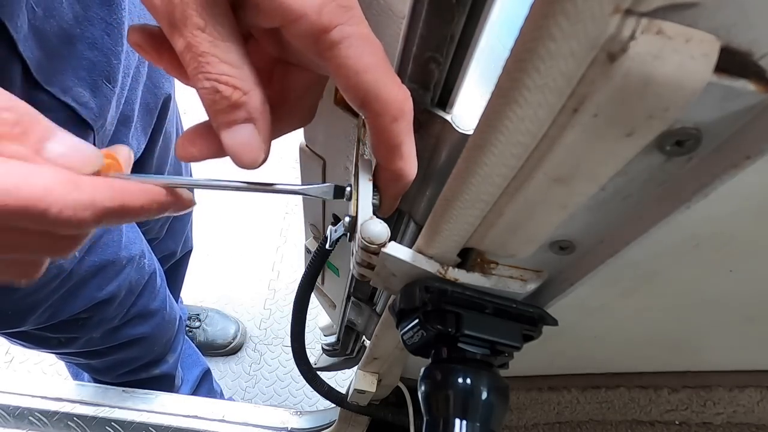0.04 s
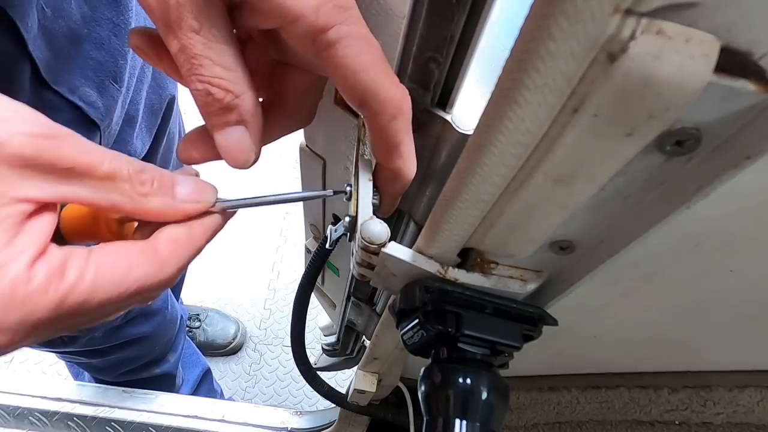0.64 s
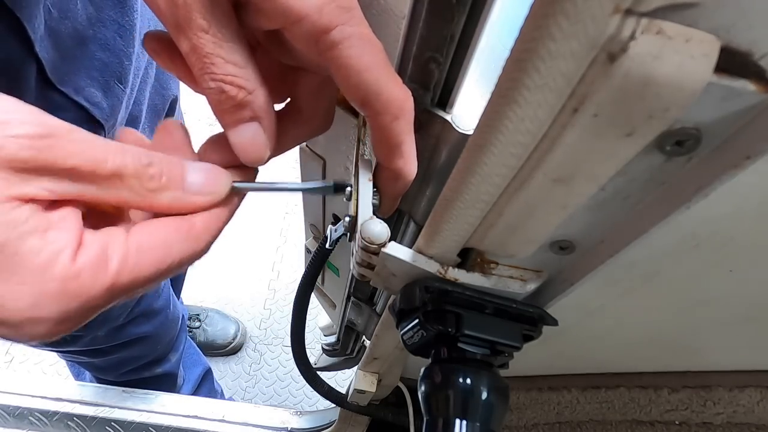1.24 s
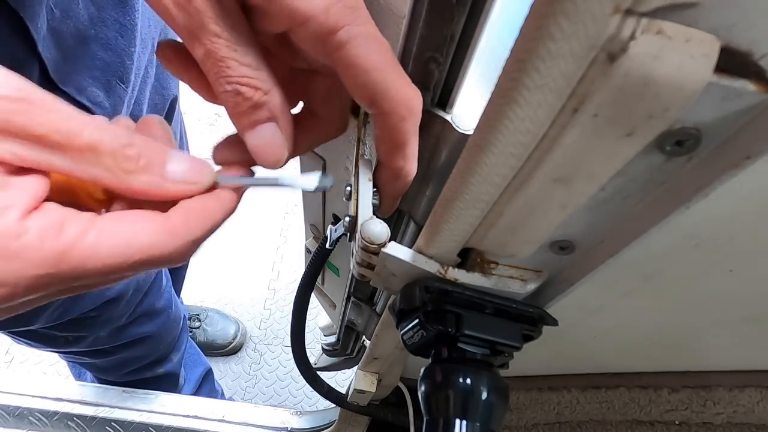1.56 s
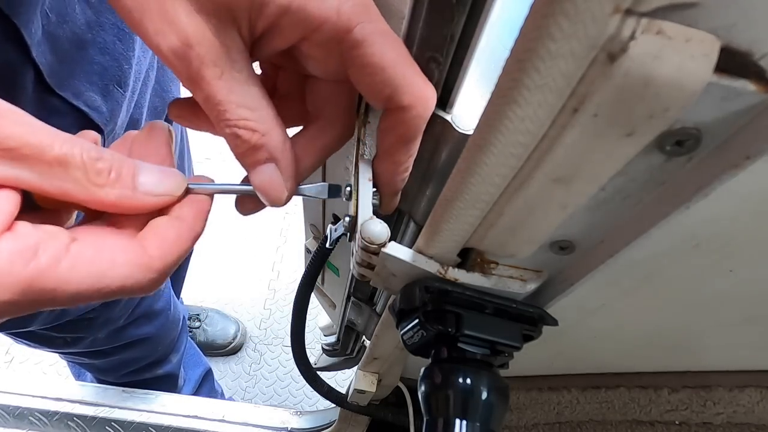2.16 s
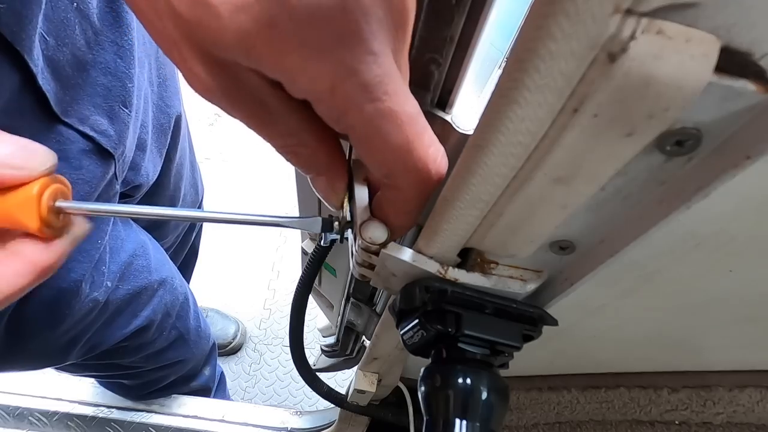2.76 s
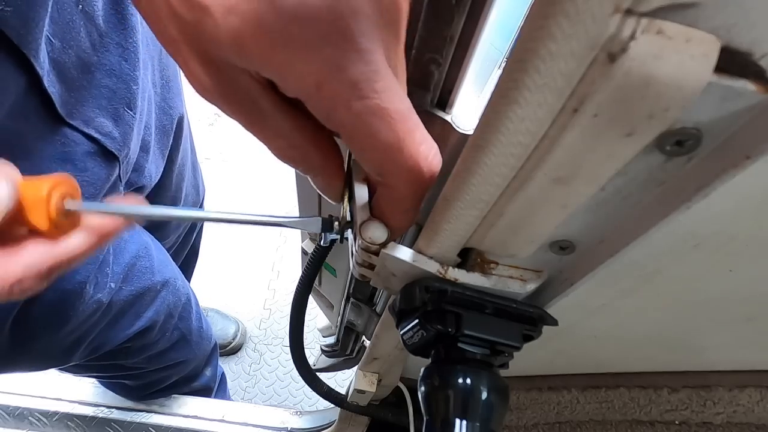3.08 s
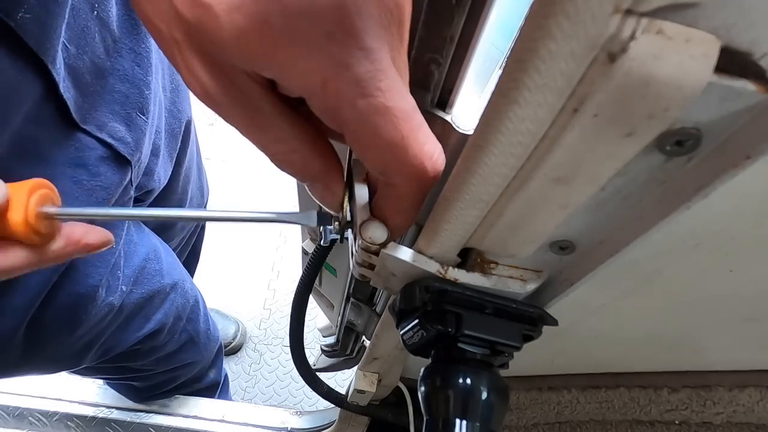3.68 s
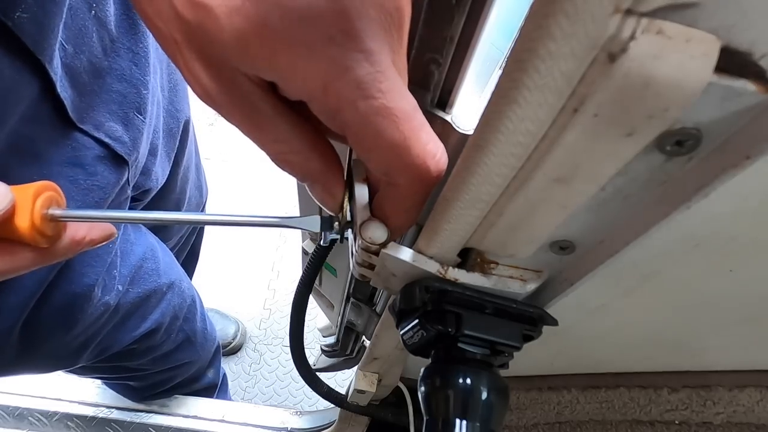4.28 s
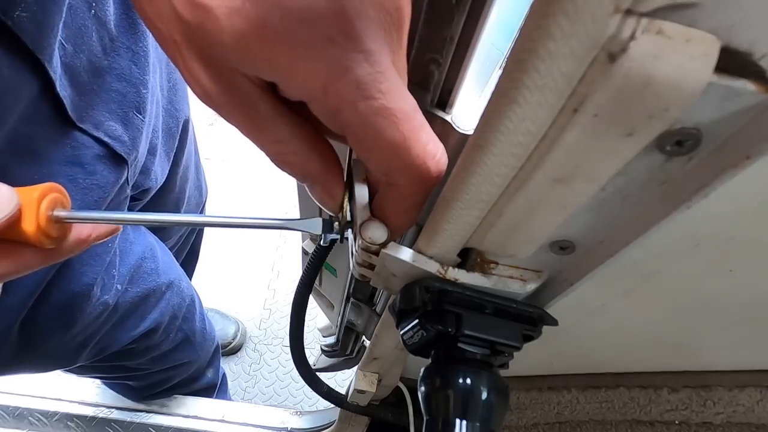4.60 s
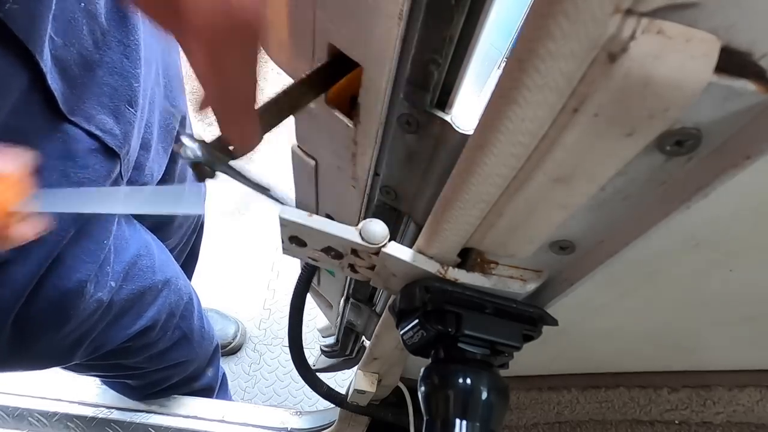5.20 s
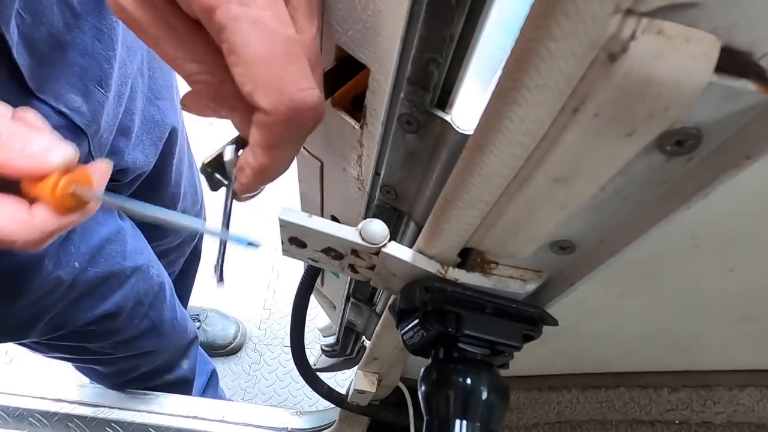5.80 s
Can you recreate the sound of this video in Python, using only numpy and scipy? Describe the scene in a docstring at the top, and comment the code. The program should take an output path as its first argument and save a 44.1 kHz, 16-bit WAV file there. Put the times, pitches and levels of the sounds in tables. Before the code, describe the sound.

A screwdriver works on a screw close to the microphone, outdoors, over a soft rumble and hiss. For the first five seconds it makes quiet, irregular ticks and soft scrapes, with a small slip at 0.5 seconds, a sharper skid at 1.3 and a firmer click at 3.2. A few thin, very faint bird calls come from far away between about 1.6 and 4.3 seconds. At 5.1 seconds a springy steel bar suddenly comes free and bangs against its frame in a loud, rapid clatter, sending a low shudder through the microphone. From about 5.3 seconds small steel parts ring with high, bright tones, strongest around 5.4. Loose tools then clink and drag along the bar in short scrapes, more quietly, until about 5.8 seconds. The knocks carry a slight, short echo.

```python
"""A springy steel bar comes free and bangs about in its frame, outdoors and close to a camera.
Before that, for five seconds, a screwdriver ticks and slips on the screw while a spanner holds the nut.
When the screw lets go, the bar's blows shake the camera mount and send small steel parts off ringing,
and the loose tools clink and drag along the bar. Birds call far away over a soft rumble and hiss,
and nearby panels add a short echo."""
import sys
import numpy as np
from scipy import signal
from scipy.fft import rfft, irfft, next_fast_len
from scipy.io import wavfile
from scipy.ndimage import map_coordinates

SR = 44100
rng = np.random.default_rng(int(sys.argv[2]) if len(sys.argv) > 2 else 0)


def digitize_waveform(pressure):
    """Quantize a signal to 16-bit integers and store it at the path in sys.argv[1].

    Rows of a 2-D input are taken as channels; values are limited to [-1, 1].
    """
    field = np.atleast_2d(pressure).T
    bounded = np.clip(field, -1, 1)
    quanta = np.round(bounded * 32767).astype(np.int16)
    wavfile.write(sys.argv[1], SR, quanta)


N = 257984
TIME = np.arange(N) / SR

# A "colour" says how strong each frequency is; "t60" is the time a sound takes to fade by 60 dB.
# how the three layers of the background rise and fall: t/s, rumble/dB, air/dB, hiss/dB
AIR_LEVELS = [(0.0, -55.5, -57.5, -64.5), (0.9, -62, -63, -67), (1.22, -57.5, -61, -67),
              (1.71, -58.5, -62.5, -65.5), (2.3, -59.5, -63, -69), (2.6, -51.5, -59.5, -65.5),
              (3.79, -57, -61, -65), (4.21, -58.5, -57, -63), (4.8, -57.5, -58.5, -63.5),
              (5.0, -55, -54.5, -62)]
# colour of the background: f/Hz, level/dB
OUTDOOR_COLOUR = [(12, 6), (20, 4), (81, 0), (107, -3.5), (146, -14), (301, -16.5), (388, -16),
                  (849, -16.5), (1760, -27.5), (8650, -30), (14700, -38.5), (16000, -27)]
# calls of distant birds: t/s, length/s, middle f/Hz, level/dB
BIRD_CALLS = [(1.598, 0.096, 3480, -69), (2.06, 0.088, 3950, -69), (2.486, .03, 3850, -62),
              (2.54, 0.073, 3280, -65), (2.917, 0.03, 4000, -58.5), (3.022, .05, 3430, -62),
              (3.125, .038, 4150, -60.5), (3.33, 0.03, 3600, -62), (4.285, .066, 3210, -58.5)]
# how long the echo from nearby panels lasts: f/Hz, t60/s
ECHO_DECAY = [(100, 0.27), (500, 0.21), (2000, 0.14), (6000, 0.14), (15000, 0.077)]

# colour of the shaking camera mount: f/Hz, level/dB
SHUDDER_COLOUR = [(12, -33), (20, 6), (92, -6.5), (118, -10), (232, -9), (334, -14.5), (431, -11),
                  (474, -3), (500, -23), (650, -49), (1100, -120)]
# slow, soft pushes on the camera: t/s, level/dB
CAMERA_BUFFETS = [(2.78, -45), (3.39, -44)]

# the tools slide along the bar: t/s, length/s, level/dB
TOOL_DRAGS = [(5.449, 0.078, -35.5), (5.543, 0.065, -37), (5.631, 0.062, -37.5), (5.724, 0.12, -30.5)]
# colour of steel rubbing on steel: f/Hz, level/dB
RUB_COLOUR = [(88, -36), (150, -3.5), (589, -13), (790, 4), (941, -9.5), (1630, -12.5), (2060, -7.5),
              (3770, -12.5), (6910, -19), (7920, -22), (9080, -23), (9820, -32), (16000, -29)]
# frequencies that the tools boost: f/Hz, width/Hz, level/dB
TOOL_RESONANCES = [(883, 25, -7), (1124, 27, 9), (1310, 110, -2.5), (2030, 450, -2), (2700, 120, -15),
                   (4550, 230, 2.5), (5070, 130, 4), (6200, 49, -5), (7060, 100, -3), (8750, 180, 7.5),
                   (10800, 250, -15), (11040, 240, 8), (14700, 640, -11)]

# the blade touches screw and nut; grip and pressure set the pitch: t/s, f/Hz, ring/dB, clack/dB, click/dB
BLADE_TICKS = [(.038, 830, -49, -51, -47), (.609, 1120, -37.5, -51, -48), (1.0625, 697, -47, -45.5, -80),
               (1.329, 623, -28, -31, -56), (1.8628, 735, -37.5, -56, -41.5), (1.928, 830, -41, -55, -55),
               (2.008, 980, -44, -55, -50), (2.547, 328, -47.5, -45, -83), (3.183, 414, -31.5, -25, -35.5),
               (3.187, 1090, -29, -26, -37.5), (3.26, 685, -46.5, -48, -59), (3.904, 765, -32.5, -60, -68),
               (3.912, 512, -40.5, -69, -68), (3.953, 795, -46.5, -62, -54), (4.148, 633, -38, -54, -70),
               (4.205, 1050, -38, -41, -69), (4.302, 915, -35.5, -47, -60), (4.409, 994, -38, -47, -61),
               (4.4637, 1060, -39.5, -34, -45.5), (4.798, 613, -41.5, -58, -53),
               (4.9945, 407, -42, -35.5, -74)]
# colour of a tick: f/Hz, level/dB
TICK_COLOUR = [(150, -43), (350, -15), (550, -5), (1000, -1.5), (1400, -6.5), (2200, -6.5), (3300, -19.5),
               (5000, -9.5), (8000, -17.5), (15000, -27.5)]
# tones of the held screwdriver: multiple of the tick's pitch, level/dB, share of the ring's t60
SHAFT_TONES = [(1.001, 1.5, 0.75), (2.1, -17, 0.7), (4.4, -24.5, 0.65)]
# soft scrapes, with a faint high sizzle swelling and fading: peak t/s, rasp/dB, sizzle/dB
SOFT_SCRAPES = [(.17, -50.5, -66), (.31, -57.5, -62.5), (0.531, -49, -68), (0.637, -44.5, -63),
                (.999, -52.5, -63), (1.16, -66, -65), (1.89, -50.5, -64), (2.015, -51.5, -59),
                (2.34, -57.5, -64), (2.565, -53.5, -71), (2.655, -55.5, -59.5), (2.96, -65, -62),
                (3.182, -45.5, -56), (4.164, -52, -70)]
# colour of that scraping: f/Hz, level/dB
SCRAPE_COLOUR = [(200, -13), (500, 4), (900, 5), (1800, -9.5), (2900, -9.5), (3600, -18), (5200, -7),
                 (9000, -7.5), (11500, -20), (15000, -13)]
# the blade jumps out of the slot: t/s, length of the scrape before it/s, level/dB
BLADE_SKIDS = [(.518, 0.0092, -31.5), (1.329, .04, -21.5)]
# tones of the bar humming after a skid: f/Hz, level/dB, t60/s
BAR_LOW_TONES = [(503.5, 0, 0.15), (618, 1.5, 0.073), (1022, -8, 0.059), (2560, -15, 0.061)]

# small steel parts are set ringing: t/s, level/dB, treble tilt/(dB per octave), t60/s
STEEL_RINGS = [(5.264, -29, 18, 0.21), (5.286, -26.5, -2.5, 0.38), (5.326, -25.5, 3, 0.19),
               (5.385, -7.5, 14, 0.13), (5.399, -26, 12, .12), (5.416, -22, -8, 0.061),
               (5.483, -28, 10, 0.18), (5.717, -40, 1, .18)]
# their tones, where close pairs throb against each other: f/Hz, level/dB, multiple of the ring's t60
STEEL_TONES = [(2896, -15, 1.3), (4581, -24, 1), (6019, -1, 1.2), (6066, -10, 1), (8190, -15, 1),
               (10163, -17, .9), (10245, -3.5, 1.1), (13198, -14, 1), (15332, -8, .9), (15420, -3, .9),
               (15490, -12, .8)]
# washer, spanner and blade knock together: t/s, clack/dB, click above the clack/dB, t60/s
TOOL_CLINKS = [(5.379, -37, 12, 0.05), (5.3855, -27, 6.5, 0.055), (5.3984, -22.5, 5.5, 0.063),
               (5.4177, -5, -18, 0.0081), (5.429, -34, 14, 0.062), (5.434, -16, 2, 0.019),
               (5.458, -27.5, -3, 0.043), (5.4844, -24, 7, 0.034), (5.54, -28.5, 6.5, 0.056),
               (5.543, -21.5, -3, 0.063), (5.630, -32.5, 1, 0.069), (5.6656, -18.5, 4, 0.014),
               (5.719, -24, 1.5, 0.043)]
# colour of a clink: f/Hz, level/dB
COLLISION_COLOUR = [(88, -33), (150, 13), (216, -24), (386, -3), (477, -4.5), (833, -2.5), (1430, -6),
                    (2810, -2), (3820, -7), (5950, -0.5), (6550, -2.5), (9630, -5), (10400, -13),
                    (12600, -8.5), (15000, -10)]
# the bar rings briefly as the tools graze it: t/s, level/dB
BAR_PINGS = [(5.632, -51), (5.719, -35), (5.775, -44)]
# the high tones of those pings: f/Hz, level/dB, t60/s
BAR_HIGH_TONES = [(1870, -5, 0.25), (2630, -2, 0.28), (4700, 1, 0.09), (6840, 1.5, 0.12), (8800, -2, .25),
                  (11400, -22, 0.24)]

# the bar hits its frame: t/s, level/dB, step from each band to the next higher/dB, hardness from 0 to 1
BAR_BLOWS = [(5.0806, -8.5, 0, 0.99), (5.112, -10, 1.5, 1), (5.120, -6.5, 2.5, 0.73),
             (5.133, -18.5, 0, 0.47), (5.1543, -14.5, -4.5, 0.8), (5.176, -31, 0, 0),
             (5.219, -23.5, -2, 0.28), (5.237, -25.5, -3.5, 0.01), (5.2498, -15.5, 5, 0.69),
             (5.263, -22, 2, 1), (5.316, -34, -2, 0.45)]
# colour of a blow: f/Hz, level/dB
BLOW_COLOUR = [(71, -36), (120, 0.5), (217, -13), (289, 0), (569, -6), (617, -2.5), (805, -4), (1030, -5.5),
               (1290, -5), (2530, -12), (3520, -16), (7660, -15.5), (16000, -30.5)]
# frequencies that the frame boosts: f/Hz, width/Hz, level/dB
FRAME_RESONANCES = [(288, 130, -20), (864, 13, -1), (1072, 33, 2.5), (1562, 14, 2), (1983, 74, -1.5),
                    (2270, 33, 7.5), (2540, 82, -8), (3220, 200, -14)]
# low tones of the whole frame clunking: f/Hz, level/dB, t60/s
FRAME_TONES = [(264, -6, 0.2), (307, 6.5, 0.13), (381.3, 1.5, 0.24), (515, -8, 0.12), (623, 7.5, 0.1),
               (670, -14, 0.14)]


def amp(db):
    """Turn decibels into a number to multiply by."""
    return 10 ** (np.asarray(db) / 20)


def unit(x):
    """Scale a signal to an average strength (rms) of 1."""
    return x / np.sqrt(np.mean(x ** 2) + 1e-20)


def since(s):
    """Seconds since time s, zero before it."""
    return np.maximum(TIME - s, 0)


def along(points, hz):
    """Read between the rows of a (frequency, value) table, giving each octave equal room."""
    freqs, values = np.transpose(points)
    return np.interp(np.log(hz + 1), np.log(freqs + 1), values)


def wobble(rate):
    """A smooth random curve through `rate` new values a second."""
    return map_coordinates(rng.standard_normal(int(N * rate / SR) + 4), [TIME * rate])


def metal_gain(hz, colour, resonances, lift_db, ripple_hz, ripple_db):
    """The tone of a metal part: its colour, a few strong peaks and a ripple of many weak ones."""
    peaks = sum(amp(db + lift_db) / (1 + (2 * (hz - centre) / width) ** 2)
                for centre, width, db in resonances)
    ripple = np.interp(hz / ripple_hz, np.arange(2048), rng.standard_normal(2048))
    return amp(along(colour, hz)) * (1 + peaks) * amp(ripple_db * ripple)


def noise_bands(gain, edges_hz):
    """Noise shaped by gain(hz) and split softly at the edges into equally strong bands."""
    size = next_fast_len(N)
    hz = np.fft.rfftfreq(size, 1 / SR)
    spectrum = rfft(rng.standard_normal(size)) * gain(hz)
    bands = []
    for low, high in zip(edges_hz, edges_hz[1:]):
        band = 1 / np.sqrt((1 + (low / (hz + 1)) ** 8) * (1 + (hz / high) ** 8))
        bands.append(unit(irfft(spectrum * band)[:N]))
    return bands


def add_burst(out, noise, s, db, rise, t60):
    """Add a burst of noise that swells up to time s and then dies away."""
    span = slice(max(0, int((s - 6 * rise) * SR)), int((s + 1.5 * t60) * SR))
    t = TIME[span] - s
    shape = np.exp(np.minimum(t, 0) / rise) * amp(-60 * np.maximum(t, 0) / t60)
    burst = noise[span] * shape
    out[span] += amp(db) * burst * np.linalg.norm(shape) / (np.linalg.norm(burst) + 1e-12)


def ring(tones, s, rise, blur=0):
    """Fading tones from time s on; blur makes them waver, as in a part that tumbles and rattles."""
    out, first = np.zeros(N), int(s * SR)
    t = TIME[:min(N - first, SR // 3)]
    attack = 1 - np.exp(-t / rise)
    for hz, db, t60 in tones:
        cycles = hz * t + rng.random()
        cycles += blur * np.cumsum(rng.standard_normal(len(t))) / np.sqrt(SR)
        out[first:first + len(t)] += amp(db - 60 * t / t60) * np.sin(2 * np.pi * cycles) * attack
    return np.sqrt(2) * out


def outdoor_air():
    """Low rumble, soft air and hiss, each drifting a little in level."""
    rumble, air, hiss = noise_bands(lambda hz: amp(along(OUTDOOR_COLOUR, hz)), [15, 170, 2500, 16000])
    times, *columns = np.transpose(AIR_LEVELS)
    rumble_db, air_db, hiss_db = [np.interp(TIME, times, column) for column in columns]
    return (rumble * amp(rumble_db + 0.74 + 0.7 * wobble(8.8))
            + air * amp(air_db - 1.16 + 1.8 * wobble(48))
            + hiss * amp(hiss_db - 1.5 + 0.06 * wobble(10)))


def birds():
    """Thin, buzzy calls far away that glide up and level off."""
    out = np.zeros(N)
    buzz = 1 + 0.035 * wobble(900)
    for s, length, hz, db in BIRD_CALLS:
        span = slice(int(s * SR), int((s + length) * SR))
        progress = np.linspace(0, 1, span.stop - span.start)
        sweep_hz = 4000 * np.exp(-length / 0.0277)  # short calls climb steeply, long ones hardly at all
        pitch = (hz + sweep_hz * (0.25 - (1 - progress) ** 2)) * buzz[span]
        out[span] += amp(db) * np.sin(np.pi * progress) * np.sin(2 * np.pi * np.cumsum(pitch) / SR)
    return out


def panel_echo(x):
    """Nearby panels answer with a short, slightly stereo echo whose treble dies first."""
    hz, t, spectrum = signal.stft(rng.standard_normal((2, SR // 2)), SR, nperseg=256)
    fade = amp(-60 * t / along(ECHO_DECAY, hz)[:, None])
    tail = signal.istft(spectrum * fade, SR, nperseg=256)[1]
    mid, side = signal.fftconvolve(x[None], tail / np.linalg.norm(tail[0]), axes=1)[:, :N]
    return mid + amp(-40.5) * np.array([side, -side])


def camera_mount():
    """The bar's jolt travels up the mount as a low shudder; before it, slow buffets come and go."""
    jolt_s, attack_s, hold_s, fall_db_per_s = 5.08, 0.02, 0.22, 89
    shudder, = noise_bands(lambda hz: amp(along(SHUDDER_COLOUR, hz)), [18, 380])
    buffet, = noise_bands(lambda hz: 1 / (hz + 10), [6, 24])
    attack = 1 - np.exp(-since(jolt_s) / attack_s)
    shake = amp(-21 - fall_db_per_s * since(jolt_s + hold_s))
    handling = amp(-44.5)  # a little shudder stays while the tools are moved
    sway = sum(amp(db) * np.exp(-0.5 * ((TIME - s) / 0.14) ** 2) for s, db in CAMERA_BUFFETS)
    return shudder * attack * (shake + handling) + buffet * sway


def dragging_tools():
    """Steel slides on steel in small catches that make the tools ring; each slide fades as it slows."""
    attack_s, sag_db_per_s, release_s = 0.0047, 66, 0.018
    gain = lambda hz: metal_gain(hz, RUB_COLOUR, TOOL_RESONANCES,
                                 lift_db=2.5, ripple_hz=50.5, ripple_db=2)
    rub, = noise_bands(gain, [200, 16000])
    pressure = np.zeros(N)
    for s, length, db in TOOL_DRAGS:
        attack = 1 - np.exp(-since(s) / attack_s)
        release = np.exp(-since(s + length) / release_s)
        pressure += amp(db - sag_db_per_s * since(s)) * attack * release
    catches = amp(2.4 * wobble(160))
    return rub * pressure * catches


def blade_ticks():
    """Each touch of the blade gives a hollow ring, a thud, a clack and a click; low ones last longer."""
    out, rise_s = np.zeros(N), 0.00036
    thud, clack, click = noise_bands(lambda hz: amp(along(TICK_COLOUR, hz)), [240, 850, 3300, 15000])
    for s, hz, ring_db, clack_db, click_db in BLADE_TICKS:
        clack_t60 = 21.8 / hz  # 21.8 cycles of the pitch
        ring_t60 = 1.9 * clack_t60
        tones = [(hz * multiple, db, ring_t60 * share) for multiple, db, share in SHAFT_TONES]
        out += amp(ring_db) * ring(tones, s, rise_s)
        add_burst(out, thud, s, ring_db - 13, rise_s, ring_t60)
        add_burst(out, clack, s, clack_db, rise_s, clack_t60)
        add_burst(out, click, s, click_db, rise_s, 0.7 * clack_t60)
    return out


def blade_skids(rasp, sizzle):
    """The blade scrapes ever harder, judders and jumps out of the slot, leaving tool and bar humming."""
    swell_db_per_s, stop_s = 478, 0.0053
    judder_hz, judder_t60 = 531.5, 0.081
    out = np.zeros(N)
    scrape = (amp(-5) * rasp + amp(-18) * sizzle) * unit(amp(2.5 * wobble(600)))
    judder = np.sqrt(2) * amp(-0.5) * np.sin(2 * np.pi * (judder_hz * TIME + 0.09 * wobble(200)))
    for s, length, db in BLADE_SKIDS:
        swell = (TIME > s - length) * amp(db - swell_db_per_s * np.maximum(s - TIME, 0))
        fade_in = np.minimum(since(s - length) / length, 1)
        out += swell * scrape * np.exp(-since(s) / stop_s)
        out += swell * judder * fade_in * amp(-60 * since(s) / judder_t60)
        out += amp(db) * ring(BAR_LOW_TONES, s, rise=0.0013)
    return out


def screwdriver():
    """The blade ticks in the slot and skids; soft scrapes and a faint high sizzle swell and fade."""
    out = blade_ticks()
    rasp, sizzle = noise_bands(lambda hz: amp(along(SCRAPE_COLOUR, hz)), [340, 3400, 15800])
    grain = unit(amp(2.7 * wobble(500)))
    for s, rasp_db, sizzle_db in SOFT_SCRAPES:
        add_burst(out, rasp * grain, s, rasp_db, rise=0.022, t60=0.14)
        add_burst(out, sizzle * grain, s, sizzle_db, rise=0.022, t60=0.14)
    return out + blade_skids(rasp, sizzle)


def ringing_steel():
    """Washer and spanner ring as they fly and collide, each ring with its own level, brightness, length."""
    out = np.zeros(N)
    for s, db, tilt_db, t60 in STEEL_RINGS:
        tones = [(hz, level + tilt_db * np.log2(hz / 10000), t60 * multiple)
                 for hz, level, multiple in STEEL_TONES]
        out += amp(db) * ring(tones, s, rise=0.0024, blur=1.1)
    flicker = amp(wobble(110))
    return out * flicker


def clinking_tools():
    """The loosened tools collide in short, bright knocks and graze the bar, which pings."""
    out = np.zeros(N)
    gain = lambda hz: metal_gain(hz, COLLISION_COLOUR, TOOL_RESONANCES,
                                 lift_db=2, ripple_hz=70.84, ripple_db=3)
    knock, clack, click = noise_bands(gain, [200, 900, 3500, 15600])
    for s, db, bright_db, t60 in TOOL_CLINKS:
        rise = 0.013 * t60
        knock_db = db - 4 + 10.5 * np.log2(t60 / 0.055)  # a briefer contact carries less low knock
        add_burst(out, knock, s, knock_db, rise, 1.74 * t60)
        add_burst(out, clack, s, db, rise, t60)
        add_burst(out, click, s, db + bright_db, rise, 0.58 * t60)
    roughness = amp(2.1 * wobble(900))
    pings = sum(amp(db) * ring(BAR_HIGH_TONES, s, rise=0.0015, blur=1.5) for s, db in BAR_PINGS)
    return out * roughness + pings


def banging_bar():
    """The freed bar hammers and chatters on its frame, which clunks; hard blows are sharp and short."""
    soft_rise_s, hard_rise_s = 0.0026, 0.00017
    soft_t60, hard_t60 = 0.16, 0.037
    crash = np.zeros(N)
    gain = lambda hz: metal_gain(hz, BLOW_COLOUR, FRAME_RESONANCES,
                                 lift_db=3.5, ripple_hz=45.54, ripple_db=1.2)
    knock, clack, click = noise_bands(gain, [170, 750, 3300, 16000])
    for s, db, tilt_db, hardness in BAR_BLOWS:
        rise = soft_rise_s * (hard_rise_s / soft_rise_s) ** hardness
        t60 = soft_t60 * (hard_t60 / soft_t60) ** hardness
        add_burst(crash, knock, s, db - tilt_db, rise, 1.42 * t60)  # the low band lasts longest
        add_burst(crash, clack, s, db - 0.5, rise, t60)
        add_burst(crash, click, s, db + tilt_db, rise, 0.72 * t60)
    chatter = amp(2.3 * wobble(700))
    clunks = sum(amp(db - tilt_db - 16.5) * ring(FRAME_TONES, s, rise=0.00056)
                 for s, db, tilt_db, _ in BAR_BLOWS)
    return crash * chatter + clunks


def scene():
    """Every source sits in the middle; the far birds get the largest share of echo."""
    unscrewing = screwdriver()
    clatter = banging_bar() + clinking_tools()
    calls = birds()
    direct = unscrewing + clatter + calls
    direct += ringing_steel() + dragging_tools() + camera_mount() + outdoor_air()
    return direct + panel_echo(amp(-19) * unscrewing + amp(-15) * clatter + amp(-4) * calls)


def record(dry):
    """The loudest blows overload the camera, which rounds off their peaks; it also cuts the top treble."""
    ceiling, top_hz = 1.05, 15900
    rounded = dry / (1 + np.abs(dry / ceiling) ** 6) ** (1 / 6)
    size = next_fast_len(N + 8192)
    treble_cut = 1 / (1 + (np.fft.rfftfreq(size, 1 / SR) / top_hz) ** 120)
    return irfft(rfft(rounded, size) * treble_cut, size)[..., :N]


dry = scene()
out = record(dry)
digitize_waveform(out)
```